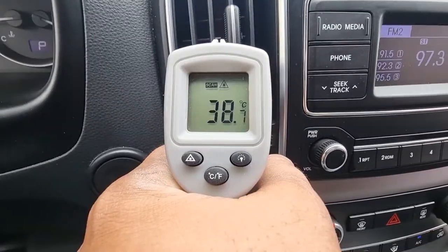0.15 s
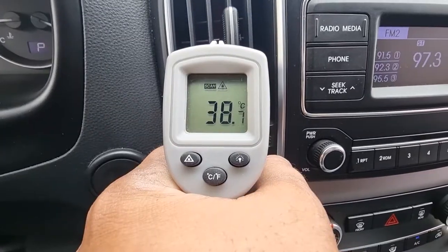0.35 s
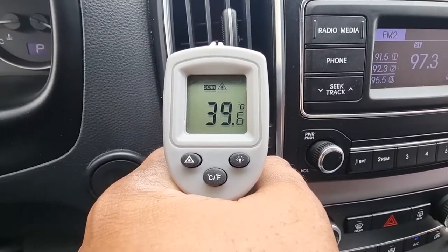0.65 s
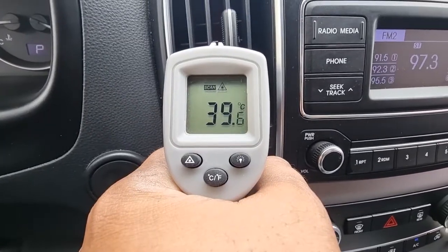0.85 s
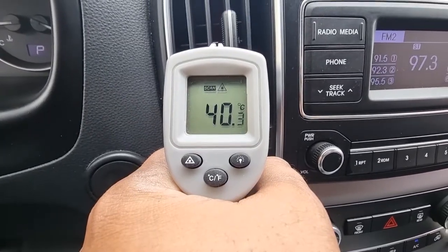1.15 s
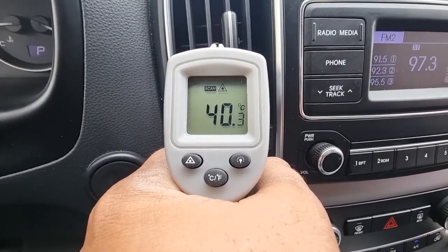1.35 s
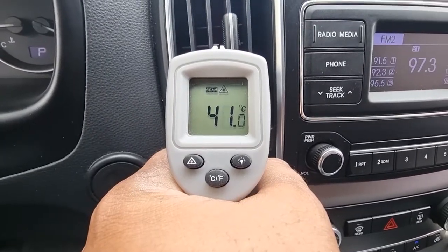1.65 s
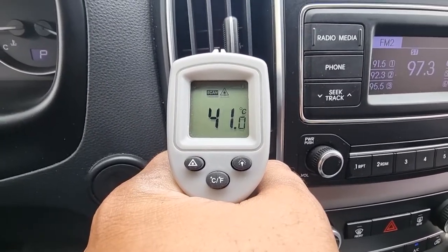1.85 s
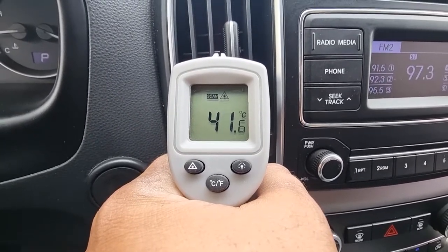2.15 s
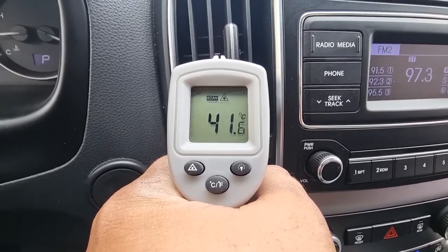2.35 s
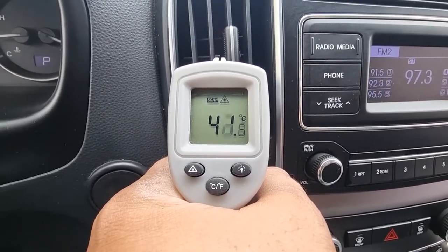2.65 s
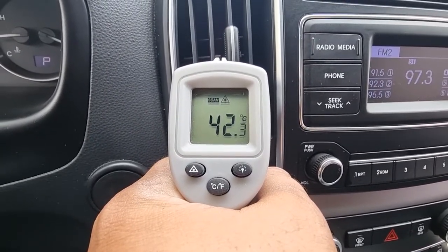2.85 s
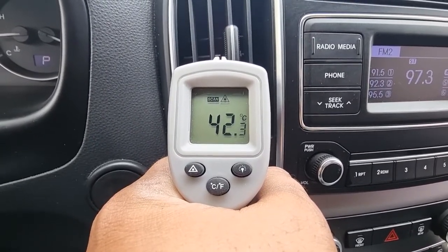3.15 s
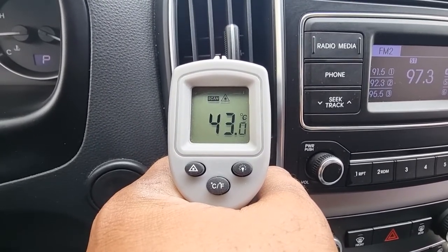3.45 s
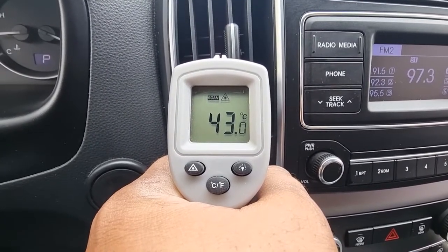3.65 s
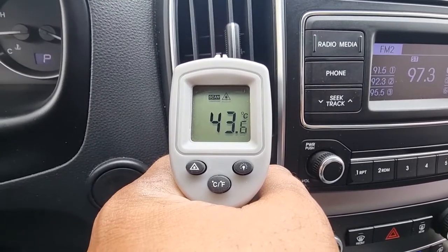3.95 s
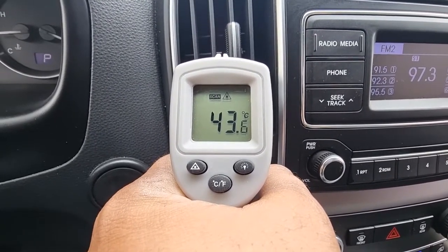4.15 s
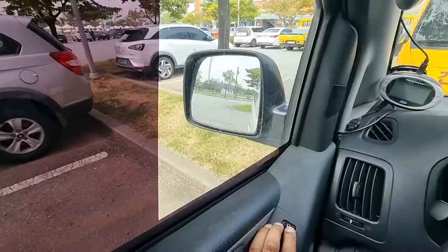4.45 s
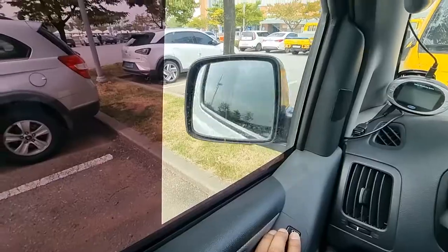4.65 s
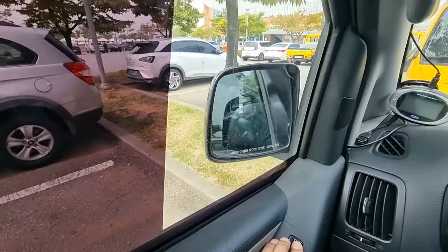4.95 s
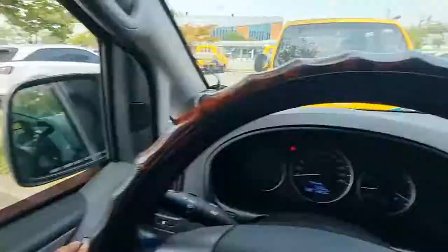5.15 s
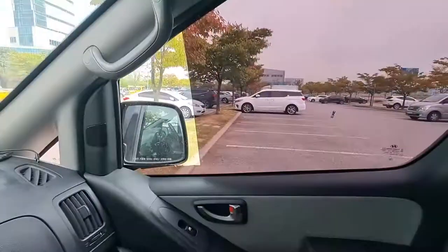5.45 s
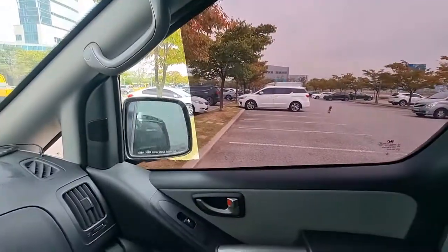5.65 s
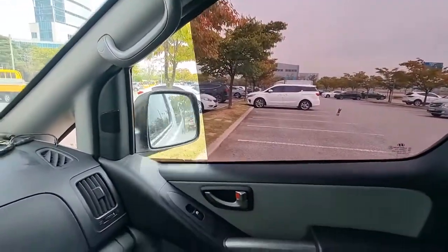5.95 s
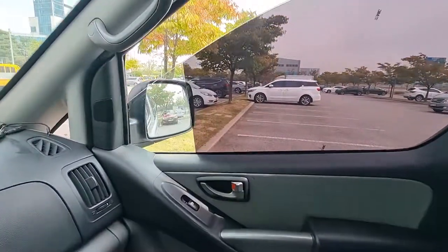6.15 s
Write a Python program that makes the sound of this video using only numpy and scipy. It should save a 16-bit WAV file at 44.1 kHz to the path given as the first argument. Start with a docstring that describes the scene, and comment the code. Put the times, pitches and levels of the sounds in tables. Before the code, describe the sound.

A tiny blip of air opens the clip, then silence until 0.12 s, when a dashboard blower roars in close. Broad, hollow rushing air fills the foreground, while irregular gusts thump and flap against the microphone, strongest on the left, with idling-engine throb beneath. The force rises and dips, with brief hollow puffs near 1.1 and 1.7 s and a dry tap on the right at 4.35 s. It stops dead at 4.37 s. After a short gap, from 4.45 s, the cabin is far quieter: steady engine drone, faint buzz, soft rumble and hiss, with tiny ticks at once. Around 5.2 s the tone shifts duller and more hollow as the microphone turns. Finger knocks tick at 5.53 s. At 5.93 s a window switch clacks sharply with ringing plastic and a small thud; from 5.99 s an electric motor spins up, whining and humming unsteadily until an abrupt end at 6.4 s.

```python
"""Air rushes from a vent and buffets the microphone in a parked van: a short burst, a gap, then the full blower.
The rush is coloured noise, the buffeting is noise driven by gusts; the idling engine hums through the duct.
After an abrupt break the cabin is quiet: engine orders as sines, rumble, hiss and a few handling ticks.
Near the end a window switch clicks (noise bursts, ringing trim) and the window motor starts to whine (sines)."""
import sys
import numpy as np
from scipy import signal
from scipy.fft import rfft, irfft
from scipy.io import wavfile
from scipy.ndimage import uniform_filter1d, map_coordinates

SR = 44100
rng = np.random.default_rng(int(sys.argv[2]) if len(sys.argv) > 2 else 0)


def materialize(psi):
    """Save the field psi as 16-bit PCM at rate SR to the path in sys.argv[1].

    A 1-D psi becomes a single channel; in a 2-D psi each row is a channel.
    """
    bounded = np.clip(np.atleast_2d(psi).T, -1, 1)
    quanta = np.round(bounded * 32767).astype(np.int16)
    wavfile.write(sys.argv[1], SR, quanta)


N = 278271
T = np.arange(N) / SR  # s
HZ = np.maximum(np.arange(N // 2 + 1) * SR / N, 1)

# stretches with sound, silence between: (start [s], end [s])
LIVE_SPANS = [(-0.01, 0.0245), (0.120, 4.3655), (4.452, 6.4)]
BLOWER_OFF_S = 4.41
CUTOFF_HZ = 17000
FIRING_HZ = 26.02

# engine in the quiet cabin: (multiple of firing rate, facing passenger side [dB rms], facing driver's door [dB rms])
ENGINE_ORDERS = [(3, -61.5, -63), (6, -65, -60), (9, -52, -62), (12, -62.5, -72), (15, -70, -77),
                 (18, -69.5, -92), (21, -70.5, -73.5)]
# buzz of the engine's clatter: (multiple of firing rate, rounded in use,
#   facing passenger side [dB rms], facing driver's door [dB rms])
CLATTER_ORDERS = [(33, -78.5, -90), (54, -78.5, -83), (57, -78.5, -84), (60, -77, -74), (62.4, -88, -84),
                  (66, -79, -94), (69.3, -81, -95), (71.6, -82, -82)]
# microphone swings from passenger side to driver's door: (start [s], end [s])
MIC_TURN_S = (5.19, 5.24)
# slower change of hiss colour around that swing: (start [s], end [s])
HISS_CHANGE_S = (5.22, 5.38)
# engine rumble through the body: (frequency [Hz], relative density [dB per Hz])
RUMBLE_SPECTRUM = [(30, -28), (45, -15), (58, 4), (115, -2), (180, -1), (235, 0), (290, 3), (370, -3),
                   (470, -6.5), (620, -3.5), (850, -14.5), (1300, -44), (4000, -70)]
# cabin hiss facing the passenger side: (frequency [Hz], relative density [dB per Hz])
PASSENGER_HISS_SPECTRUM = [(500, -11), (850, -0.5), (1050, 0.5), (1250, -7.5), (1420, -2), (1650, -5),
                           (2080, -6), (2400, -1), (2900, -4.5), (3700, -10.5), (4150, -9.5), (5300, -13.5),
                           (7200, -14.5), (15500, -32)]
# cabin hiss facing the driver's door: (frequency [Hz], relative density [dB per Hz])
DOOR_HISS_SPECTRUM = [(500, -20), (900, -4), (1060, 5.5), (1280, -6.5), (1580, 2), (2000, 1.5),
                      (2400, -1.5), (3100, -3.5), (4400, -7), (7000, -12), (11000, -17.5), (15500, -28)]
# stereo image of rumble and hiss: (frequency [Hz], left-right likeness [-1..1], L-R [dB])
CABIN_STEREO = [(60, .99, 0), (295, 0.96, -2.5), (640, 0.44, 4.5), (1420, 0.31, 3.5), (3070, -0.66, 0.5),
                (8000, -0.13, -2.5)]
RUMBLE_DB, PASSENGER_HISS_DB, DOOR_HISS_DB = -62, -71, -69.5
# whirr in the cabin hiss: (time [s], level [dB rms])
WHIRR_LEVEL = [(4.45, -74), (5.27, -75), (5.42, -86)]

# handling ticks: (time [s], level before filter [dB], L-R [dB], low [Hz], high [Hz], t60 [s], knock on trim [dB])
TICK_EVENTS = [(4.4717, -52.5, -3, 4000, 15000, 0.013, -70), (4.5313, -50.5, 2, 4300, 5500, .022, -70),
               (5.5284, -41, -1, 1900, 2600, 0.028, -54), (5.5328, -37, 6, 1000, 1300, 0.04, -60)]
# window switch and drive taking up load, relative levels: (time [s], body [dB], snap [dB], thud [dB])
SWITCH_EVENTS = [(5.9275, -70, -60, -70), (5.9312, -49, -58, -60), (5.933, -62, -59, -37),
                 (5.937, -51, -51.5, -48), (5.942, -31, -66, -51), (5.9455, -52, -63, -40),
                 (5.9614, -48, -49.5, -39), (5.985, -64, -52.5, -60)]
# door trim modes: (frequency [Hz], relative level [dB], t60 [s])
TRIM_MODES = [(358, -9.5, 0.056), (640, -18, 0.049), (1036, -12.5, 0.078), (1180, -19, 0.046),
              (1700, -19, .06), (1975, -8.5, 0.032), (2100, -7, 0.037), (2300, -15, .035),
              (2450, -4, 0.023), (2620, -13, .02), (3340, -14, 0.045), (3770, -12, 0.032),
              (4400, -27, .022)]
# window motor, speed wavering with the drag of the glass: (time [s], whine [Hz], whine level [dB], hum level [dB])
MOTOR_RUN = [(5.988, 1924, -60, -47), (6.005, 2250, -65, -43), (6.022, 2443, -62.5, -56),
             (6.045, 2448, -58.5, -46), (6.104, 2340, -59, -54), (6.15, 2374, -65, -58),
             (6.19, 2390, -68, -54), (6.23, 2340, -61, -50), (6.27, 2270, -60, -54), (6.31, 2135, -67, -54)]
MOTOR_ATTACK_S = 0.0039

# idling engine through the open vent: (multiple of firing rate, level [dB rms], L-R [dB])
VENT_ENGINE_ORDERS = [(1, -45, 2.5), (2, -41, -6), (3, -49, 4.5), (5, -61.5, 4), (6, -57.5, -1.5),
                      (7, -57, 7), (17, -62.5, -3), (18, -61, -6.5), (19, -66, 1), (20, -63.5, 0),
                      (21, -66.5, 5), (22, -58.5, 2.5), (24, -62, 6), (25, -69, -1.5), (28, -72, 4)]
# rush from the louvres: (frequency [Hz], relative density [dB per Hz])
RUSH_SPECTRUM = [(150, -24.5), (250, -6.5), (411, -7), (455, -3), (550, -2), (873, -13.5), (1510, -11),
                 (1670, -16), (1990, -17.5), (3380, -23.5), (4150, -24.5), (4930, -32), (6820, -30),
                 (7690, -34.5), (15000, -70.5)]
# stereo image of rush: (frequency [Hz], left-right likeness [-1..1], L-R [dB])
RUSH_STEREO = [(260, 0.29, 6.5), (443, 0.45, 1), (820, 0.34, 3.7), (1050, 0.77, 1), (1650, 0.6, 0),
               (2270, 0.35, -2.5), (2920, -0.12, -4), (6870, 0.15, -2), (12000, -0.35, 4.5)]
RUSH_DB = -52
# duct and cabin resonances excited by the air:
#   (frequency [Hz], width [Hz], relative level [dB], left-right likeness [-1..1], L-R [dB])
DUCT_MODES = [(183.1, 21.5, -49, 0.77, -3.5), (480, 68, -59.5, 0.59, -6.5), (538, 37, -59, 0.046, -8),
              (580, 110, -57.5, 0.38, -2), (779, 55, -61.5, 0.2, 2), (1012, 76, -62, 0.78, 1.5),
              (2398, 37, -76, 0.053, -13), (2770, 60, -78, -0.072, 0.5), (6850, 200, -87, -0.5, -1.5)]
# puffs that set the duct humming: (time [s], level [dB])
PUFF_EVENTS = [(1.094, -42), (1.724, -39.5)]
# how squarely the jet meets the hand-held microphone: (time [s], relative level [dB])
JET_LEVEL = [(0.13, -15), (0.3, -12), (0.45, -0.5), (0.72, -14.5), (0.9, -2), (1.3, 0), (2.0, 0),
             (2.26, -2.5), (2.4, 5.5), (2.55, -3), (2.9, 0.5), (3.0, -8), (3.12, 1), (3.3, 0), (3.5, 3),
             (3.88, 2), (4.15, -13), (4.28, 6)]
# strongest gusts and lulls: (time [s], extra thump [dB], extra flap [dB])
GUST_EVENTS = [(0.555, 14, -1.5), (0.979, 9, 5.5), (1.095, 5, 5.5), (1.285, 2.5, -1.5), (1.405, -6, -1.5),
               (1.665, 5.5, -1.5), (2.349, 2, 0.5), (2.67, 3.5, 5.5), (3.555, 3, 5), (3.615, -15, -14.5),
               (3.84, 4, 6), (3.985, -9.5, -3)]
GUST_LENGTH_S = 0.018
# thump of large eddies: (frequency [Hz], relative density [dB per Hz])
THUMP_SPECTRUM = [(15, -6.5), (30, -7.5), (40, 4), (60, 3), (75, 8), (100, -2), (135, -13), (250, -44),
                  (800, -100)]
THUMP_DB = -35.5  # at 0 dB jet, before port gains
# flap of small eddies: (frequency [Hz], relative density [dB per Hz])
FLAP_SPECTRUM = [(60, -22.5), (110, -2), (140, -2.5), (165, 2.5), (200, 2), (240, -6), (275, -12.5),
                 (330, -8.5), (400, -18), (480, -19), (800, -35), (3000, -73.5)]
# flap level before gusts and port gains: (time [s], level [dB])
FLAP_LEVEL = [(0.14, -44.5), (0.38, -38), (0.55, -48), (0.7, -50.5), (0.87, -41.5), (1.18, -41),
              (1.32, -38.5), (1.6, -41.5), (1.75, -42.5), (2.2, -45.5), (2.36, -42), (2.52, -43),
              (2.7, -40.5), (2.89, -40.5), (3.0, -51), (3.12, -41.5), (3.33, -43.5), (3.85, -37.5),
              (4.05, -52), (4.17, -48.5), (4.33, -40)]


def from_db(db):
    """Decibels to gain."""
    return 10 ** (np.asarray(db) / 20)


def rms_one(x):
    """Scale to unit power."""
    return x / np.sqrt(np.mean(x ** 2) + 1e-20)


def in_time(rows):
    """Each column of a curve, at every sample."""
    s, *columns = np.transpose(rows)
    return [np.interp(T, s, c) for c in columns]


def in_frequency(rows):
    """Each column of a spectrum, at every bin, linear in log frequency."""
    hz, *columns = np.transpose(rows)
    return [np.interp(np.log(HZ), np.log(hz), c) for c in columns]


def pan(db):
    """Left and right gains for an L-R level difference."""
    return from_db(np.array([[.5], [-.5]]) * db)


def drift(rate_hz):
    """Slow random wander: spline through Gaussian knots."""
    knots = rng.standard_normal(4096)
    return map_coordinates(knots, [T * rate_hz % 4096], order=2)


def swell(centre_s, length_s):
    """Gaussian rise and fall of height 1."""
    return np.exp(-.5 * ((T - centre_s) / length_s) ** 2)


def clicks(times, levels_db):
    """One sharp impulse at each time."""
    force = np.zeros(N)
    force[(times * SR).astype(int)] = from_db(levels_db)
    return force


def decays(times, levels_db, t60_s, attack_s=.0002):
    """Envelope that rises at each time and dies away."""
    envelope = 0
    for start_s, db in zip(times, levels_db):
        age = np.maximum(T - start_s, 0)
        rise = 1 - np.exp(-age / attack_s)
        envelope = envelope + from_db(db) * rise * np.exp(-np.log(1000) * age / t60_s)
    return envelope


def band_pass(x, low_hz, high_hz):
    """Gentle band filter."""
    edges_hz = [low_hz, min(high_hz, SR / 2 - 1)]
    return signal.sosfilt(signal.butter(2, edges_hz, "band", fs=SR, output="sos"), x + 1e-18)


def ring(force, hz, t60_s):
    """Two-pole resonator: a unit click sets a decaying sine of about height 1 ringing."""
    r, w = from_db(-60 / (t60_s * SR)), 2 * np.pi * hz / SR
    return signal.lfilter([0, np.sin(w)], [1, -2 * r * np.cos(w), r * r], force + 1e-18)


def steady(x, span_s):
    """Hold the short-time power of a stereo signal at one."""
    power = uniform_filter1d(np.mean(x ** 2, axis=0), max(int(span_s * SR), 8))
    return x / np.sqrt(power + 1e-12)


def late_left(x, lag_s):
    """The sound reaches the left port a little later."""
    return np.array([np.interp(T - lag_s, T, x[0]), x[1]])


def white_pair(alike):
    """Spectra of two white noises with the given likeness."""
    mid, side = rfft(rng.standard_normal((2, N)))
    alike = np.clip(alike, -1, 1)
    return np.sqrt((1 + alike) / 2) * mid + np.sqrt((1 - alike) / 2) * side * [[1], [-1]]


def air_noise(spectrum, image, band_hz):
    """Coloured stereo noise, unit power inside the band before the L-R balance."""
    gain = from_db(in_frequency(spectrum)[0])
    in_band = (HZ > band_hz[0]) * (HZ < band_hz[1])
    gain = gain / np.sqrt(np.mean(gain ** 2 * in_band))
    alike, balance_db = in_frequency(image)
    return irfft(white_pair(alike) * gain * pan(balance_db), N)


def reflections(x, strength=0.097, count=14):
    """Short echoes from glass and dashboard comb the sound, differently at each port."""
    response = np.zeros((2, N))
    for side in response:
        delays_s = rng.uniform(.0015, .018, count)
        side[(delays_s * SR).astype(int)] = strength * rng.choice([-1, 1], count)
        side[0] = 1
    return irfft(rfft(x) * rfft(response), N) / np.sqrt(1 + count * strength ** 2)


def firing_phase(wobble):
    """Angle of the firing cycle; the idle speed wanders slightly."""
    return 2 * np.pi * np.cumsum(FIRING_HZ * (1 + wobble * drift(5.96))) / SR


def order_tone(order, phase):
    """Sine at a whole multiple of the firing rate, random start angle."""
    return np.sin(round(order) * phase + 2 * np.pi * rng.random())


def cabin(boom_db=-58.0, boom_low_hz=198, boom_high_hz=275, boom_lumpy_db=2.5, pulse_depth=0.12, pulse_order=3):
    """Engine rumble, hiss pulsing at a multiple of the firing rate, uneven hollow boom near the driver's door."""
    hiss_turned = np.interp(T, HISS_CHANGE_S, [0, 1])
    rumble = air_noise(RUMBLE_SPECTRUM, CABIN_STEREO, band_hz=(330, 900))
    passenger = air_noise(PASSENGER_HISS_SPECTRUM, CABIN_STEREO, band_hz=(3000, 14000))
    door = air_noise(DOOR_HISS_SPECTRUM, CABIN_STEREO, band_hz=(3000, 14000))
    hiss = np.sqrt(1 - hiss_turned) * passenger * from_db(PASSENGER_HISS_DB)
    hiss = hiss + np.sqrt(hiss_turned) * door * from_db(DOOR_HISS_DB)
    pulsing = 1 + pulse_depth * np.sin(2 * np.pi * pulse_order * FIRING_HZ * T)
    boom = rms_one(band_pass(rng.standard_normal(N), boom_low_hz, boom_high_hz))
    boom = boom * np.interp(T, MIC_TURN_S, [0, 1]) * from_db(boom_db + boom_lumpy_db * drift(18))
    return rumble * from_db(RUMBLE_DB) + reflections(hiss) * pulsing + boom


def whirr(hz=2400, width_hz=150, alike=0.75, balance_db=5, lag_s=.00012):
    """Broad resonance in the cabin hiss, fading once the microphone has turned."""
    level_db, = in_time(WHIRR_LEVEL)
    narrow = irfft(white_pair(alike) / (1 + ((HZ - hz) / width_hz) ** 2), N)
    return late_left(rms_one(narrow) * from_db(level_db) * pan(balance_db), lag_s)


def whistle(hz=4140, db=-81, centre_s=4.84, length_s=0.079, wander=0.00043):
    """A faint thin whistle comes and goes: a sine with slight pitch wander."""
    phase = 2 * np.pi * np.cumsum(hz * (1 + wander * drift(34))) / SR
    return from_db(db) * swell(centre_s, length_s) * np.sin(phase)


def engine_orders(orders, phase, uneven_db):
    """Sum of firing orders; cabin standing waves change their mix as the microphone turns."""
    turned = np.interp(T, MIC_TURN_S, [0, 1])
    total = 0
    for order, passenger_db, door_db in orders:
        level_db = passenger_db + (door_db - passenger_db) * turned + uneven_db * drift(21)
        total = total + from_db(level_db) * order_tone(order, phase)
    return total


def engine(wobble=0.0014, uneven_db=1.5, balance_db=3.0, buzz_uneven_db=3.0, buzz_balance_db=3, buzz_lag_s=0.00021):
    """Firing orders of one engine: the low ones drone, the high ones buzz."""
    phase = firing_phase(wobble)
    drone = engine_orders(ENGINE_ORDERS, phase, uneven_db) * pan(balance_db)
    buzz = engine_orders(CLATTER_ORDERS, phase, buzz_uneven_db) * pan(buzz_balance_db)
    return np.sqrt(2) * (drone + late_left(buzz, buzz_lag_s))  # rms to peak


def trim(times, levels_db, uneven_db=6.5, lag_s=0.00016):
    """Knocks ring the plastic trim; each reaches every mode and port with a strength of its own."""
    ports = []
    for _ in range(2):
        total = 0
        for k, (hz, db, t60_s) in enumerate(TRIM_MODES):
            knocks_db = levels_db + db + uneven_db * rng.standard_normal(len(times))
            total = total + (-1) ** k * ring(clicks(times, knocks_db), hz, t60_s)
        ports.append(total)
    return late_left(ports, lag_s)


def ticks():
    """Small dry contacts of fingers on plastic: filtered noise bursts and trim knocks."""
    scuffs = 0
    for s, db, balance_db, low_hz, high_hz, t60_s, _ in TICK_EVENTS:
        burst = decays([s], [db], t60_s) * rng.standard_normal((2, N))
        scuffs = scuffs + band_pass(burst, low_hz, high_hz) * pan(balance_db)
    times, *_, knocks_db = np.transpose(TICK_EVENTS)
    return scuffs + trim(times, knocks_db)


def switch(body_db=-0.5, snap_t60_s=0.05, snap_attack_s=0.00062, thud_hz=135, thud_t60_s=0.044,
           crack_db=7.0, crack_t60_s=0.032, tail_db=-15, tail_t60_s=.12):
    """Each contact snaps, cracks with a tail in the door, rings the trim and thuds in the panel."""
    times, bodies_db, snaps_db, thuds_db = np.transpose(SWITCH_EVENTS)
    dying = decays(times, bodies_db + crack_db, crack_t60_s) + decays(times, bodies_db + tail_db, tail_t60_s)
    crack = band_pass(dying * rng.standard_normal((2, N)), 1800, 2550)
    snapping = decays(times, snaps_db, snap_t60_s, snap_attack_s)
    snap = band_pass(snapping * rng.standard_normal((2, N)), 3200, 12300)
    thud = band_pass(ring(clicks(times, thuds_db), thud_hz, thud_t60_s), 60, 900)
    return trim(times, bodies_db + body_db, uneven_db=3.5) + crack + snap + thud


def window_motor(slots_count=8, jitter=0.0016, start_jitter=0.0396, settle_s=.018, rough_db=2.0,
                 whine_pan_db=4, whine_lag_s=.00015, hum_pan_db=1, slide_db=-76, brush_db=-75):
    """Rotor hums once a turn, whines once a slot, unsteady at spin-up; brushes hiss, glass slides in its seal."""
    whine_hz, whine_db, hum_db = in_time(MOTOR_RUN)
    age = np.maximum(T - MOTOR_RUN[0][0], 0)
    unsteady = jitter * drift(200) + start_jitter * np.exp(-age / settle_s) * drift(980)
    phase = 2 * np.pi * np.cumsum(whine_hz * (1 + unsteady)) / SR
    whine = from_db(whine_db + rough_db * drift(90)) * np.sin(phase) * pan(whine_pan_db)
    whine = late_left(whine, whine_lag_s)
    hum = from_db(hum_db + rough_db * drift(50)) * np.sin(phase / slots_count) * pan(hum_pan_db)
    slide = from_db(slide_db) * rms_one(band_pass(rng.standard_normal((2, N)), 1300, 2200))
    brushes = from_db(brush_db) * rms_one(band_pass(rng.standard_normal((2, N)), 4000, 15500))
    return (np.sqrt(2) * (whine + hum) + slide + brushes) * np.minimum(age / MOTOR_ATTACK_S, 1)


def engine_in_vent(wobble=.001, uneven_db=-0.04, lag_s=0.00038):
    """The duct carries the engine's slow throb and a cluster of higher orders to the microphone."""
    phase = firing_phase(wobble)
    drone = 0
    for order, db, balance_db in VENT_ENGINE_ORDERS:
        drone = drone + from_db(db + uneven_db * drift(9.2)) * order_tone(order, phase) * pan(balance_db)
    return np.sqrt(2) * late_left(drone, lag_s)


def pop(at_s=4.3453, db=-27, hz=2500, t60_s=0.001, balance_db=-13):
    """One sharp, dead tap on the housing beside the right port."""
    return band_pass(ring(clicks(np.array([at_s]), db), hz, t60_s), 700, 4500) * pan(balance_db)


def puffs(low_hz=420, high_hz=540, length_s=0.0092, balance_db=5):
    """A strong eddy blows a brief, hollow puff across the duct's main resonances."""
    push = sum(from_db(db) * swell(s, length_s) for s, db in PUFF_EVENTS)
    hollow = steady(band_pass(rng.standard_normal((1, N)), low_hz, high_hz), 0.022)
    return hollow * push * pan(balance_db)


def vent(early_db=3.0, settle_s=0.74, duct_db=0.36, flutter_db=0.5, duct_flutter_db=2.5,
         duct_lag_s=0.0003, rush_lag_s=0.00031):
    """Fluttering rush from the louvres plus turbulence ringing in the duct."""
    rush = air_noise(RUSH_SPECTRUM, RUSH_STEREO, band_hz=(1000, 8000))
    rush = rush * from_db(RUSH_DB + flutter_db * drift(40))
    # upper middle eases as the microphone settles in front of the vent
    extra = from_db(early_db * np.exp(-T / settle_s)) - 1
    rush = rush + extra * band_pass(rush, 1300, 2200)
    duct = 0
    for hz, width_hz, db, alike, balance_db in DUCT_MODES:
        response = 1 / (1 + ((HZ ** 2 - hz ** 2) / (1.8 * HZ * width_hz)) ** 2)
        duct = duct + white_pair(alike) * rms_one(response) * from_db(db) * pan(balance_db)
    duct = irfft(duct, N) * from_db(duct_db + duct_flutter_db * drift(30))
    return late_left(reflections(rush), rush_lag_s) + late_left(duct, duct_lag_s)


def eddies(spectrum, image, gust_db, left_db, right_db, right_share, span_s):
    """Eddies hit the left port head on; the sheltered right port feels the gusts far less."""
    noise = steady(air_noise(spectrum, image, band_hz=(20, 2000)), span_s)
    mean_db = gust_db.mean()
    sheltered_db = mean_db + right_db + right_share * (gust_db - mean_db)
    return noise * from_db([gust_db + left_db, sheltered_db])


def buffeting(lumpy_db=1.1, lumps_per_s=16):
    """The jet sheds two sizes of eddy: large ones thump, small ones flap, each in random lumps."""
    (jet_db,), (flapping_db,) = in_time(JET_LEVEL), in_time(FLAP_LEVEL)
    thump_db = THUMP_DB + jet_db + lumpy_db * drift(lumps_per_s)
    flap_db = flapping_db + lumpy_db * drift(lumps_per_s)
    for s, extra_thump_db, extra_flap_db in GUST_EVENTS:
        gust = swell(s, GUST_LENGTH_S)
        thump_db = thump_db + extra_thump_db * gust
        flap_db = flap_db + extra_flap_db * gust
    # stereo image: (frequency [Hz], left-right likeness [-1..1], L-R [dB])
    thump_image = [(25, 1.0, 0.0061), (71, 0.73, 0.021), (128, 0.36, 0.012)]
    flap_image = [(121, 0.35, 0.0026), (186, 0.45, 0.012), (270, -0.0035, 0.0047)]
    thump = eddies(THUMP_SPECTRUM, thump_image, thump_db, left_db=4.5, right_db=-2.0, right_share=0.32, span_s=.09)
    flap = eddies(FLAP_SPECTRUM, flap_image, flap_db, left_db=3.0, right_db=-2.5, right_share=0.14, span_s=0.076)
    return thump + flap


def scene():
    """First the blower, then the quiet cabin."""
    blowing = vent() + engine_in_vent() + buffeting() + puffs() + pop()
    quiet = engine() + cabin() + whirr() + whistle() + ticks() + switch() + window_motor()
    return np.where(T < BLOWER_OFF_S, blowing, quiet)


def record(dry, fade_s=0.00079):
    """Each stretch fades in quickly and stops dead; the top is cut."""
    live = sum(np.clip((T - start_s) / fade_s, 0, 1) * (T < end_s) for start_s, end_s in LIVE_SPANS)
    return signal.sosfilt(signal.cheby2(12, 70, CUTOFF_HZ, fs=SR, output="sos"), dry * live)


dry = scene()
out = record(dry)
materialize(out)
```